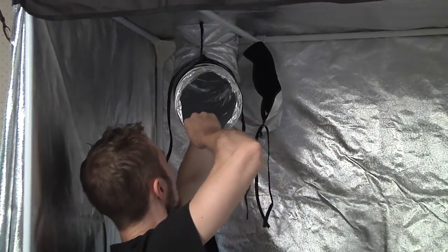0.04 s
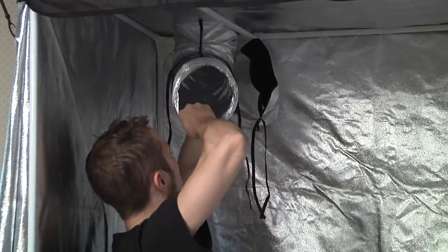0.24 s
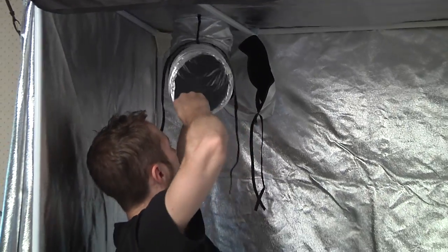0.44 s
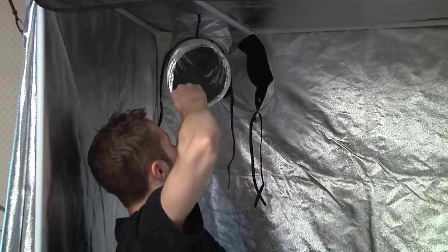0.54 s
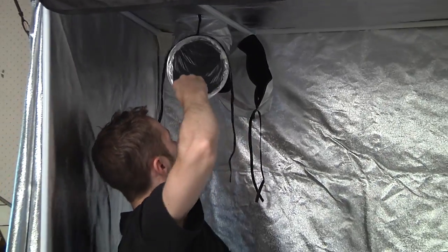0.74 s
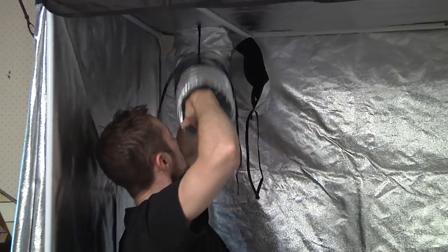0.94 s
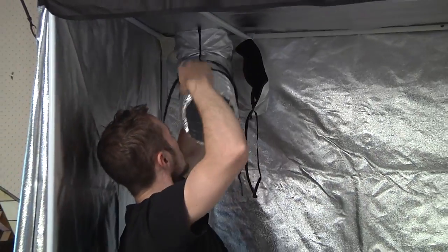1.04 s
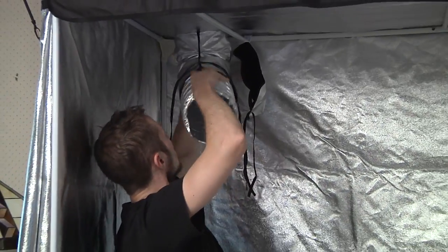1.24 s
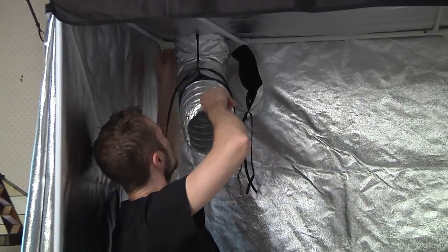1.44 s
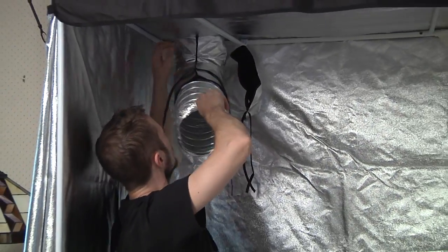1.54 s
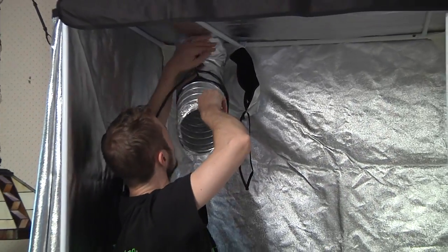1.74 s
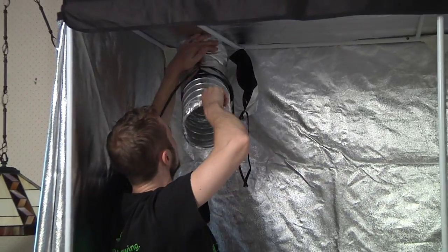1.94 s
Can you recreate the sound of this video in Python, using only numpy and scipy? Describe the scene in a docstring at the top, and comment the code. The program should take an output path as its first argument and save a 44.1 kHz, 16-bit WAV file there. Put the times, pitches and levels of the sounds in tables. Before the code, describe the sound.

A foil duct crackles and rustles through a fabric sleeve, loudest early, then fainter.

```python
"""Foil duct through a tent port

A flexible foil duct is pushed through the fabric port of a foil-lined tent. Its pleats snap and
its wall buckles over a rustle of tiny creases and the low rub of the sleeve; the wire hoop pings
once. The roof throws these sounds back, a short tail follows, and the hollow duct rings along.
Underneath, the tent wall heaves softly in quiet room noise."""
import sys
import numpy as np
from scipy import signal
from scipy.fft import rfft, irfft
from scipy.io import wavfile
from scipy.ndimage import uniform_filter1d

SR = 44100
rng = np.random.default_rng(int(sys.argv[2]) if len(sys.argv) > 2 else 0)


def master_out(mix):
    """Clip the mix to full scale and print it as 16-bit PCM to the path in sys.argv[1]."""
    frames = np.transpose(np.atleast_2d(mix))
    ceiling = np.clip(frames, -1, 1)
    pcm = np.round(ceiling * 32767).astype(np.int16)
    wavfile.write(sys.argv[1], SR, pcm)


N = 88200
T = np.arange(N) / SR


def from_db(db):
    """Decibels to gain."""
    return 10 ** (np.asarray(db) / 20)


def unit(x):
    """Scale to rms 1."""
    return x / np.sqrt(np.mean(x ** 2) + 1e-20)


def coloured(x, points):
    """EQ a steady sound along (Hz, dB) points; rms 1."""
    hz, db = np.transpose(points)
    bins = np.fft.rfftfreq(N, 1 / SR) + 1
    eq = from_db(np.interp(np.log(bins), np.log(hz), db))
    return unit(irfft(rfft(x) * eq, N))


def fader(curve):
    """Ride the gain along (seconds, dB) points."""
    return from_db(np.interp(T, *np.transpose(curve)))


def grains(per_s, flutter_db, spread_db=2, steady_s=0.015):
    """Random clicks of uneven size in quick clumps, fed by a steady push."""
    clumps = np.interp(T, np.linspace(0, T[-1], 400), rng.standard_normal(400))
    sizes = from_db(spread_db * np.minimum(rng.exponential(1, N), 4) + flutter_db * clumps)
    clicks = sizes * rng.choice([-1, 1], N) * (rng.random(N) < per_s / SR)
    local_power = np.abs(uniform_filter1d(clicks ** 2, int(steady_s * SR) + 1))
    return clicks / np.sqrt(local_power + 1e-6)


def folds(rows, top_hz, give_s=0.00057, size=4096):
    """Each fold gives way in a quick, dying flurry that rings round its own centre."""
    out, t = np.zeros(N + size), T[:size]
    bins = np.fft.rfftfreq(size, 1 / SR) + 1
    rolloff = np.sqrt(1 + (bins / top_hz) ** 8)
    attack = 1 - np.exp(-t / give_s)
    for start_s, db, hz, octaves, decay_ms in rows:
        peak = np.exp(-.5 * (np.log2(bins / hz) / octaves) ** 2)
        skirt = from_db(-15.5) * bins / (bins + hz / 2) / np.hypot(1, bins / 8000)
        phases = np.exp(2j * np.pi * rng.random(len(bins)))
        flurry = irfft((peak + skirt) / rolloff * phases, size)
        decay = np.exp(-t / (decay_ms * 1e-3))
        gain = from_db(db) * np.sqrt(np.mean(decay ** 2))
        start = int(start_s * SR)
        out[start:start + size] += gain * unit(flurry * decay * attack)
    rumble_cut = signal.butter(3, 160, "high", fs=SR, output="sos")
    return signal.sosfilt(rumble_cut, out[:N] + 1e-18)


# The crackle swells as the foil slides. Each row: time in seconds, relative level in dB.
CRACKLE_RIDE = [(0, -48.5), (.05, -47), (.13, -48), (.21, -44), (.26, -37), (.31, -29), (.335, -45),
                (.37, -46), (.44, -35.5), (.52, -36.5), (.6, -38.5), (.64, -40.5), (.68, -41), (.75, -50),
                (.78, -53), (.85, -44), (.89, -51), (.955, -45.5), (1.0, -42.5), (1.07, -48.5), (1.12, -58),
                (1.24, -64), (1.29, -56), (1.33, -55), (1.355, -88), (1.39, -49.5), (1.46, -52),
                (1.52, -60), (1.57, -57), (1.62, -63.5), (1.69, -60.5), (1.8, -61.5), (1.86, -48.5),
                (1.93, -44.5), (2, -49)]
# The bright tone of the foil. Each row: frequency in Hz, relative level in dB.
FOIL_EQ = [(300, -28), (900, -2), (2000, 2.5), (3500, 2), (6000, 2.5), (8000, -0.5), (10500, -3.5),
           (12500, -11.5), (16000, -17)]
def foil_crackle():
    """Countless tiny creases click as the foil slides, merging into a rustle."""
    creases = grains(per_s=1800, flutter_db=1.5)
    return from_db(-3) * fader(CRACKLE_RIDE) * coloured(creases, FOIL_EQ)


# The rub comes and goes with the push. Each row: time in seconds, relative level in dB.
RUB_RIDE = [(0, -51.5), (.04, -48), (.11, -53), (.19, -41), (.24, -37), (.28, -41), (.33, -29), (.39, -29),
            (.44, -39.5), (.5, -33), (.58, -36), (.68, -48), (.76, -57), (.86, -47), (.93, -54),
            (1.02, -49), (1.08, -63), (1.13, -60), (1.22, -71.5), (1.3, -58.5), (1.35, -67.5), (1.42, -55),
            (1.55, -65), (1.74, -63), (1.85, -56), (1.95, -49), (2, -49.5)]
# The muffled tone of the sleeve. Each row: frequency in Hz, relative level in dB.
SLEEVE_EQ = [(30, -38), (55, -48), (90, -16), (140, -12), (215, 1), (300, -2.5), (450, -1), (750, -1.5),
             (1300, -4), (2200, -26), (4000, -29), (10000, -61)]
def sleeve_rub():
    """The fabric sleeve drags over the duct in many small slips."""
    slips = grains(per_s=1500, flutter_db=-2.3)
    return from_db(-5.5) * fader(RUB_RIDE) * coloured(slips, SLEEVE_EQ)


# The tone of the room. Each row: frequency in Hz, relative level in dB.
ROOM_EQ = [(25, -25), (100, 2.5), (250, 1), (1000, -8.5), (4000, -14.5), (10000, -8), (16000, -16)]
def room_tone():
    """A quiet, steady bed of low noise with a little hiss on top."""
    return from_db(-68.5) * coloured(rng.standard_normal(N), ROOM_EQ)


# Crisp snaps. Each row: start in seconds, level in dB, centre in Hz, width in octaves, decay in ms.
PLEAT_SNAPS = [(.021, -44, 6000, 1.4, 4), (.0818, -33.5, 5400, 0.47, 1.9), (.0895, -27.5, 8350, 0.97, 3.2),
               (.139, -57, 2000, 1.4, 2), (.2485, -30, 5470, 0.77, 2.9), (.283, -48, 4000, 1.3, 2.3),
               (.2915, -22, 5300, 1.7, 4.3), (.3012, -27.5, 6040, 1.4, 1.5), (.3438, -19, 4150, 0.77, 3),
               (.3515, -24.5, 5000, 1.3, 5.8), (.3555, -19, 3280, 1.23, 4.2), (.390, -29, 4500, 1.05, 8.3),
               (.4665, -15.5, 5100, 0.14, 1.1), (.4758, -19.5, 5440, 0.96, 1.7),
               (.5103, -20.5, 2720, 0.98, 1.26), (.520, -28, 5500, 1.2, 3.3),
               (.5387, -15.5, 3000, 0.22, 1.1), (.5468, -17.5, 5940, 0.49, 0.78),
               (.616, -33.5, 5800, 1.1, 12), (.626, -34.5, 6100, 1, 12), (.727, -37.5, 8360, 0.75, 8.2),
               (.797, -45, 4000, 1.6, 4.5), (.8175, -29, 4170, 1.3, 1.2), (.827, -34.5, 4200, 0.83, 4),
               (.986, -38, 2000, 1.4, 2), (1.002, -48, 5000, 1, 1.7), (1.317, -53, 6000, 1, 1.5),
               (1.325, -48, 6200, 0.42, 4.6), (1.368, -43.5, 4100, 0.84, 2.7), (1.379, -45.5, 4900, 2.5, 7),
               (1.498, -62, 4860, 1.3, 1.8), (1.554, -49.5, 9200, 0.44, 3.8),
               (1.586, -48, 3500, 0.37, 0.92), (1.653, -48, 3420, 2, 1.7), (1.6615, -43, 2800, 0.59, 2),
               (1.829, -44.5, 5500, 0.88, 3.1), (1.934, -39.5, 4000, 4.8, 4.5)]
def pleat_snaps():
    """The pleats give way one by one, each with a bright snap."""
    return folds(PLEAT_SNAPS, top_hz=10800)


# Dull pops. Each row: start in seconds, level in dB, centre in Hz, width in octaves, decay in ms.
BUCKLE_POPS = [(.159, -34, 1390, 0.44, 2), (.191, -40.5, 544, 0.27, 2.8), (.213, -42, 500, 0.69, 6.4),
               (.224, -33.5, 640, 0.67, 22), (.2415, -26.5, 480, 0.79, 13), (.262, -25.5, 730, 0.22, 9.5),
               (.277, -26.5, 684, 0.41, 3.4), (.3475, -16, 690, 1.4, 1.9), (.359, -24, 473, 0.26, 6.5),
               (.371, -22.5, 1300, 1.3, 3), (.3805, -21.5, 510, 0.52, 7.2), (.3845, -23.5, 1390, 0.47, 2.4),
               (.3915, -27, 1500, 0.32, 4), (.464, -23.5, 690, 1.1, 1.9), (.476, -24.5, 440, 0.41, 3.2),
               (.539, -20.5, 1110, 0.22, 3), (.547, -24.5, 1570, .5, 5), (.582, -44, 490, 2.1, 2.2),
               (.8932, -26.5, 1070, 0.68, 2), (.9025, -37.5, 1890, 0.74, 2.6), (.898, -30.5, 272, 1.2, 10),
               (.922, -51, 900, 0.85, 2.5), (.929, -36.5, 696, 0.52, 8), (.984, -39.5, 400, 2.9, 10),
               (1.031, -39, 302, 0.72, 7.2), (1.073, -46, 400, 0.93, 4), (1.3685, -44, 960, .35, 5),
               (1.785, -54.5, 573, 1, 28), (1.819, -49, 1150, 0.65, 8.2)]
def duct_buckles():
    """The duct wall buckles with lower, rounder pops."""
    return folds(BUCKLE_POPS, top_hz=3060)


# Swells of the tent wall. Each row: peak time in seconds, level in dB, half length in seconds.
WALL_SWELLS = [(0.41, -56, 0.018), (0.905, -57, 0.028), (1.026, -65.5, 0.058), (1.422, -68.5, 0.037),
               (1.948, -60, 0.033)]
# The deep tone of the fabric. Each row: frequency in Hz, relative level in dB.
WALL_EQ = [(50, -32), (85, -3.5), (135, 4), (220, -4), (600, -58)]
def tent_wall_heaves():
    """The tent wall heaves in soft, low swells as the duct drags on it."""
    swell = sum(from_db(db) * np.exp(-((T - peak_s) / half_s) ** 2) for peak_s, db, half_s in WALL_SWELLS)
    return swell * coloured(rng.standard_normal(N), WALL_EQ)


def hoop_ping(start_s=1.4225, hz=949, rise_s=0.0017, decay_s=0.0042):
    """One short, damped ping of the wire hoop."""
    t = np.maximum(T - start_s, 0)
    envelope = np.exp(-t / decay_s) * (1 - np.exp(-t / rise_s))
    return from_db(-31) * np.sin(2 * np.pi * hz * t) * envelope


def tent_echoes(x, bands=19, roof_s=0.0044, smear_s=0.009, tail_start_s=0.0045):
    """Every crease lies elsewhere, so its echoes are diffuse: a smear off the roof and a dying tail."""
    out, bins = x, np.fft.rfftfreq(2 * N, 1 / SR) + 1
    centres_hz = np.geomspace(80, 15000, bands)
    t60s = np.geomspace(0.33, 0.25, bands)   # seconds; the highs die first
    spectrum = rfft(x, 2 * N)
    phases = np.exp(2j * np.pi * rng.random(len(bins)))
    roof = from_db(-9) * unit((T > roof_s) * np.exp(-np.abs(T - roof_s) / smear_s))
    for solo, t60 in zip(np.eye(bands), t60s):
        band = np.interp(np.log(bins), np.log(centres_hz), solo)
        power = irfft(spectrum * np.sqrt(band))[:N] ** 2
        tail = from_db(-3.5) * unit(from_db(-60 * T / t60) * (T > tail_start_s))
        echo_power = np.abs(signal.fftconvolve(power, (roof ** 2 + tail ** 2) / N)[:N])
        wash = unit(irfft(phases * band)[:N]) * np.sqrt(2 / 3)
        out = out + wash * np.sqrt(echo_power)   # noise in this band follows its echoes
    return out


# Resonances of the duct. Each row: frequency in Hz, gain in dB, time to fall 60 dB in seconds.
DUCT_MODES = [(221.5, 6.5, .35), (414.6, 1, 0.3), (457.6, 0, 0.11), (537, -3, 0.24), (625, -9, 0.49),
              (643, -20, 0.3), (807, -10, 0.26), (925, -9.5, 0.29), (1078, -13, 0.067), (1310, -8, 0.16),
              (1301, -16, 0.28), (1807, -3.5, 0.067), (1937, -1, 0.2), (2142, -1.5, 0.14)]
def duct_ring(x):
    """The hollow duct rings along at its resonances."""
    out = x
    for hz, db, t60 in DUCT_MODES:
        radius = from_db(-60 / (t60 * SR))
        drive = (1 - radius ** 2) / 2
        feedback = [1, -2 * radius * np.cos(2 * np.pi * hz / SR), radius ** 2]
        out = out + from_db(db) * signal.lfilter([drive, 0, -drive], feedback, x + 1e-18)
    return out


def scene():
    """The handling sounds ring in the tent and the duct, over the heaving wall and the room tone."""
    handling = foil_crackle() + sleeve_rub() + pleat_snaps() + duct_buckles() + hoop_ping()
    room = room_tone()
    return (duct_ring(tent_echoes(handling)) + tent_wall_heaves() + room)[None]


def record(dry):
    """A steep low-pass takes off the air above 15.8 kHz."""
    return signal.sosfilt(signal.ellip(12, .1, 80, 15800, fs=SR, output="sos"), dry)


dry = scene()
out = record(dry)
master_out(out)
```